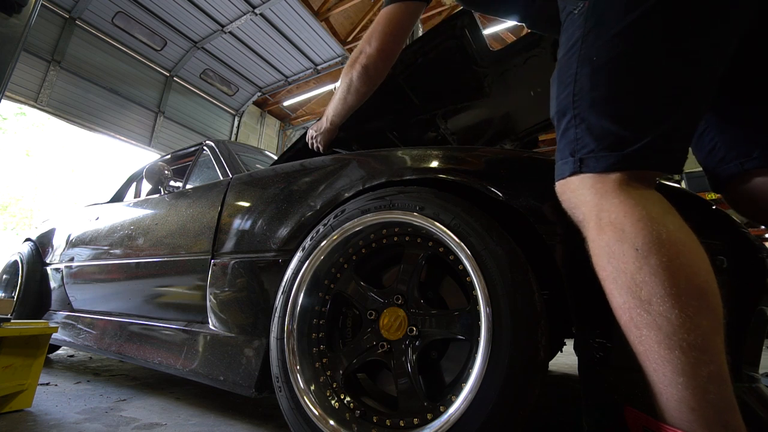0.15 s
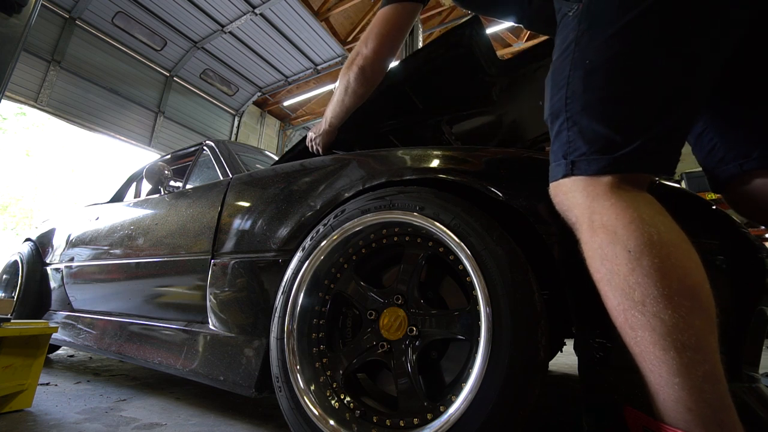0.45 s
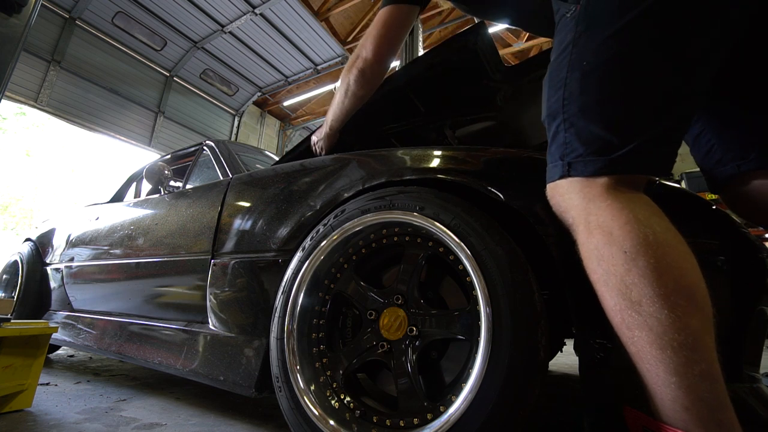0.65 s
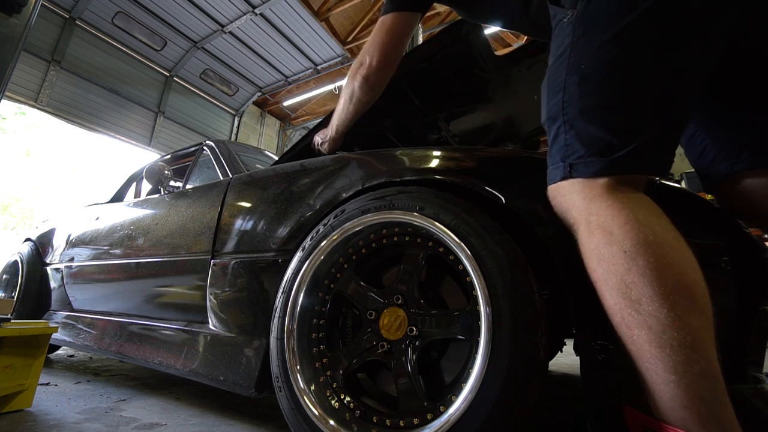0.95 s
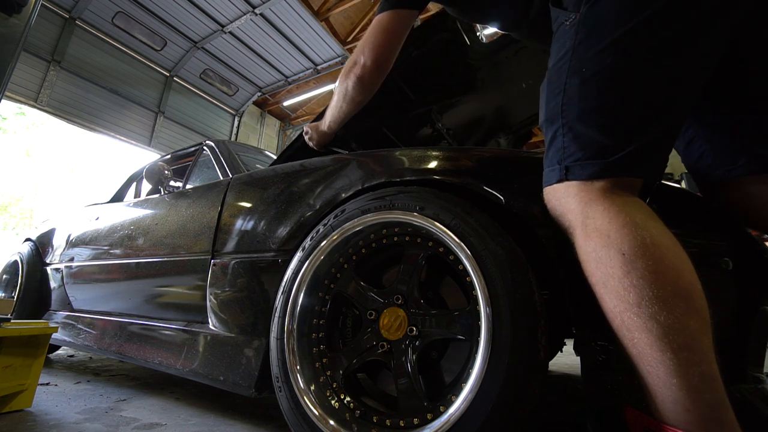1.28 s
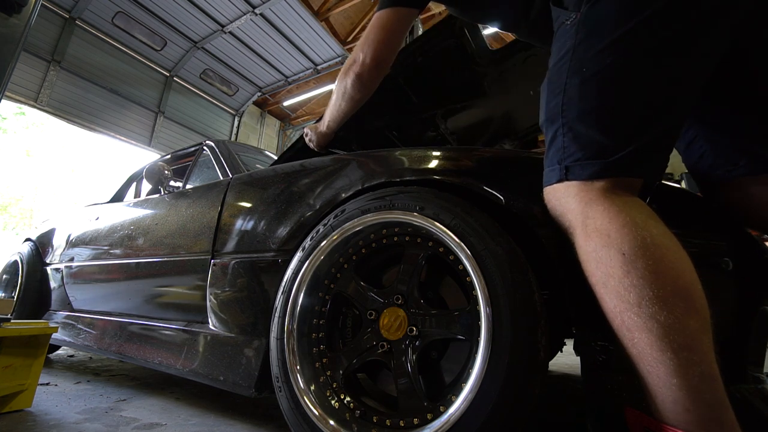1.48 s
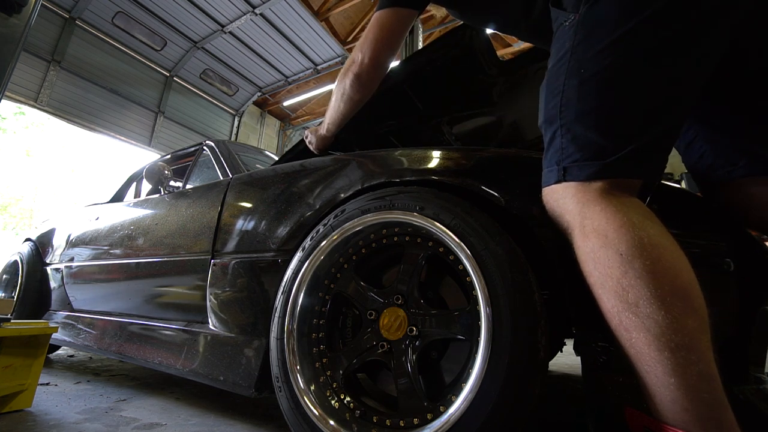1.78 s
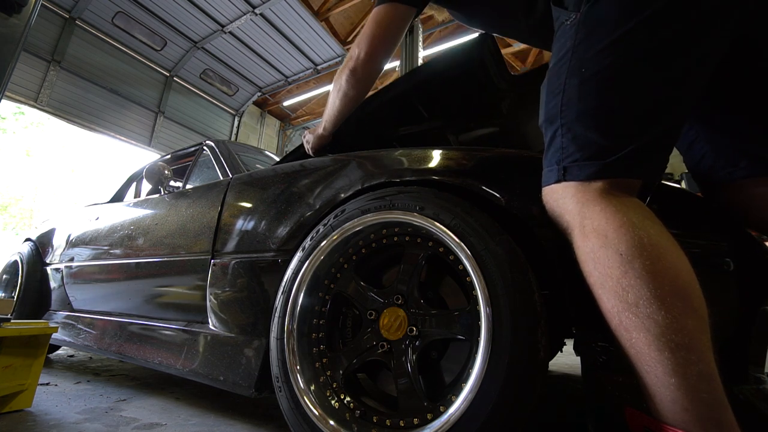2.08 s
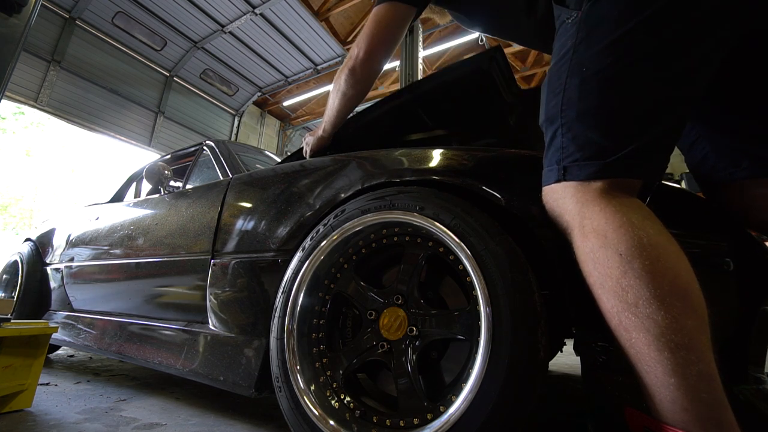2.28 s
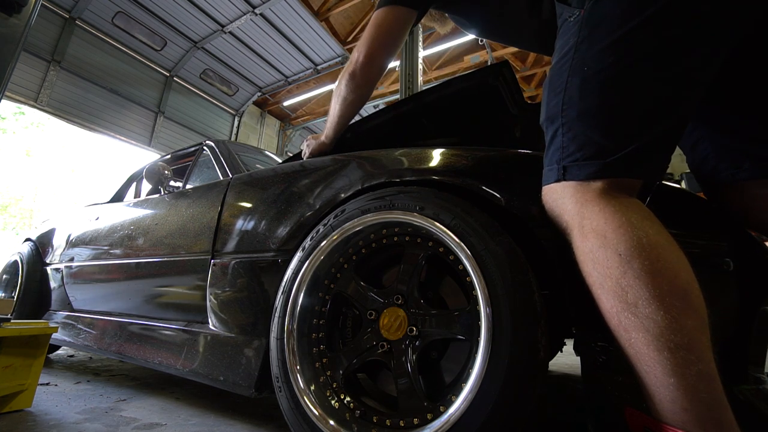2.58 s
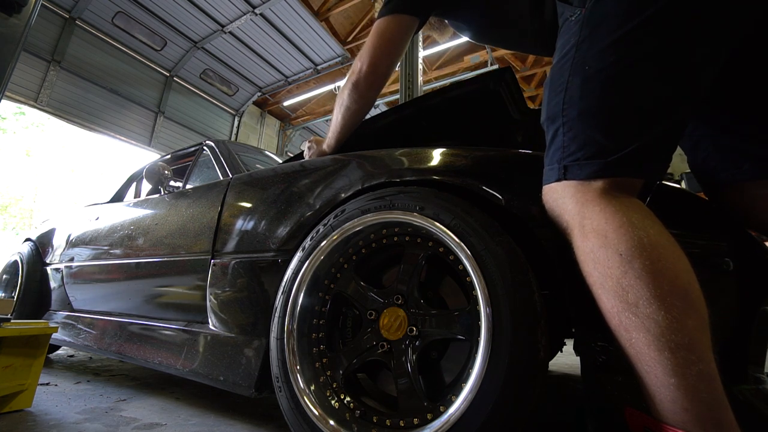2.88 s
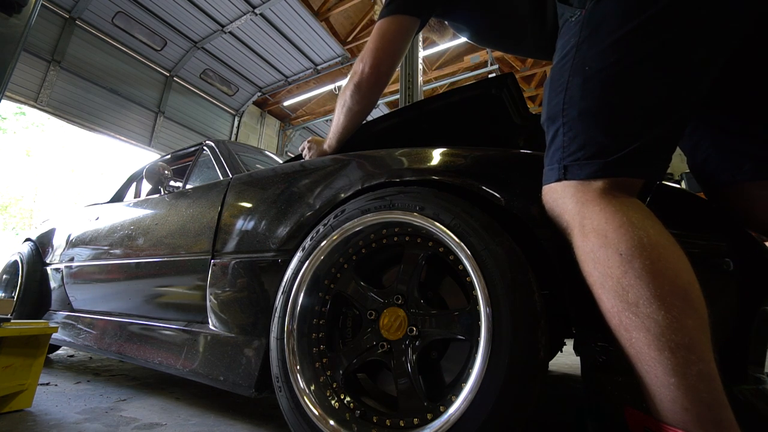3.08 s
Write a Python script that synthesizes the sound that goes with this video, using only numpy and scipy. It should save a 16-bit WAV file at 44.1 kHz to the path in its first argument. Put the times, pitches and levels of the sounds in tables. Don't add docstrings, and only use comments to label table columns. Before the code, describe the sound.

Short compressed-air blasts hiss under a car hood in a humming metal workshop

```python
import sys
import numpy as np
from scipy import signal
from scipy.fft import rfft, irfft, next_fast_len
from scipy.io import wavfile
from scipy.ndimage import uniform_filter1d, map_coordinates

SR = 44100
rng = np.random.default_rng(int(sys.argv[2]) if len(sys.argv) > 2 else 0)


def waveform_to_disk(signal):
    frames = np.transpose(np.atleast_2d(signal))
    scaled = np.clip(frames, -1, 1) * 32767
    samples = np.round(scaled).astype(np.int16)
    wavfile.write(sys.argv[1], SR, samples)


def ratio_of_db(decibels):
    return 10 ** (np.asarray(decibels, float) / 20)


N = 143325


def unit(x):
    return x / np.sqrt(np.mean(x ** 2) + 1e-20)


def along(points, hz):
    f, v = np.transpose(points)
    return np.interp(np.log(hz + 1), np.log(f + 1), v)


def wobble(knots_per_s, n=N):
    at = np.arange(0, n + 64, 64)
    curve = map_coordinates(rng.standard_normal(200), [at * knots_per_s / SR])
    return np.interp(np.arange(n), at, curve)


def filtered(x, response):
    m = next_fast_len(x.shape[-1] + SR // 4, True)
    hz = np.fft.rfftfreq(m, 1 / SR)
    return irfft(rfft(x, m) * response(hz), m)[..., :x.shape[-1]]


def rush(spectrum, patchy_db, n=N, size=512):
    hz = np.fft.rfftfreq(size, 1 / SR)
    shape = (size // 2 + 1, 2 * n // size + 3)
    z = rng.standard_normal((2, *shape)) + 1j * rng.standard_normal((2, *shape))
    patches = uniform_filter1d(rng.standard_normal(shape), size=size // 80, axis=0)
    patches = uniform_filter1d(patches, size=4096 // size, axis=1)
    gain_db = patchy_db * unit(patches) + along(spectrum, hz)[:, None]
    noise = signal.istft(z * ratio_of_db(gain_db), nperseg=size, window="cosine")[1]
    return unit(noise[:, :n])


# frequency in Hz, t60 in s.
HALL_T60 = [(300, .85), (1200, .78), (3500, .71), (7000, .55), (14000, .36)]


def hall(x):
    hz, t, z = signal.stft(rng.standard_normal((2, SR)), SR, nperseg=256)
    t60 = along(HALL_T60, hz)[:, None]
    tail = signal.istft(z * ratio_of_db(-60 * t / t60) / np.sqrt(t60), SR, nperseg=256)[1]
    return signal.fftconvolve(x, tail / np.linalg.norm(tail[0]), axes=1)[:, :x.shape[1]]


# frequency in Hz, level in dB.
FAN_LINES = [(94, 0), (119.9, -2), (141.4, -5), (190, -10), (237, -9), (330, -13), (548, -12), (685, -12)]
# frequency in Hz, density in dB per Hz.
ROOM_AIR = [(20, -24), (45, -6), (110, -7), (250, -2), (650, -4), (1000, -14), (2500, -23), (16000, -63)]
# frequency in Hz, density in dB per Hz.
HISS = [(1500, 3), (6000, -8), (12000, -17), (16000, -28)]


def workshop():
    hum_db, air_db, hiss_db = -36.5, -36, -62
    turns = np.cumsum(1 + .004 * wobble(5)) / SR
    hum = np.zeros(N)
    for hz, level_db in FAN_LINES:
        hum += ratio_of_db(level_db + 1.1 * wobble(7)) * np.sin(2 * np.pi * (hz * turns + rng.random()))
    air = ratio_of_db(air_db) * rush(ROOM_AIR, patchy_db=1.5, size=2048)
    hiss = ratio_of_db(hiss_db + 1.5 * wobble(3)) * rush(HISS, patchy_db=1.2)
    return ratio_of_db(hum_db) * hum + air + hiss


# time in s, rumble level in dB.
MOVING = [(0, -34), (.2, -29), (.3, -41), (.5, -37), (.66, -33), (.85, -42), (1.1, -38), (1.2, -35),
          (1.39, -31), (1.5, -42), (1.9, -38), (2.08, -32), (2.3, -44), (3.25, -44)]
# frequency in Hz, density in dB per Hz.
RUMBLE = [(20, -35), (60, -8), (100, 0), (250, -7), (700, -9), (1500, -19), (6000, -42), (16000, -65)]
# frequency in Hz, density in dB per Hz.
RUSTLE = [(1000, -5), (3000, -10), (9000, -14), (13000, -3), (16000, -18)]


def handling():
    rustle_s, rustle_wide_s, rustle_db = 1.08, .14, -57
    t = np.arange(N) / SR
    s, db = np.transpose(MOVING)
    rumble = ratio_of_db(np.interp(t, s, db) + 2.5 * wobble(40)) * rush(RUMBLE, patchy_db=1.5, size=2048)
    brush = ratio_of_db(rustle_db - 6 * ((t - rustle_s) / rustle_wide_s) ** 2)
    return rumble + brush * rush(RUSTLE, patchy_db=3.5)


# start in s, ring level in dB, crack over ring in dB.
KNOCKS = [
    (.576, -23, 6),
    (.5885, -13, -1.5),
    (.602, -26, 4),
]
# frequency in Hz, level in dB, t60 in s.
HOOD_MODES = [(350, -9, .12), (716, -9, .14), (930, -6, .12), (1290, -8, .12), (1556, 0, .05),
              (1720, -4, .04), (2240, -8, .04), (3800, -12, .04), (4290, -14, .05)]
# frequency in Hz, density in dB per Hz.
CRACK = [(100, -14), (400, -8), (1500, 0), (2600, -9), (4000, -6), (6500, -17), (16000, -40)]
# start in s, frequency in Hz, level in dB, t60 in s.
THUMPS = [
    (.615, 56, -27, .35),
    (.643, 130, -21, .08),
    (1.15, 60, -30, .15),
    (1.161, 280, -21, .015),
    (1.175, 300, -23, .015),
    (1.227, 280, -23, .015),
    (1.246, 250, -25, .02),
    (1.288, 420, -18, .012),
    (1.24, 95, -29, .6),
]
# start in s, level in dB.
TICKS = [
    (.039, -38),
    (.588, -21),
    (.6, -30),
    (1.688, -52),
    (1.824, -52),
    (1.866, -57),
    (3.246, -56),
]
# frequency in Hz, density in dB per Hz.
TICK = [(3000, -14), (7000, -3), (15000, 0)]


def hood():
    rise_s, crack_t60_s, tick_t60_s, hall_db = .0015, .075, .045, -7
    ring, crack, tick = np.zeros((3, N + SR))
    t = np.arange(SR // 4) / SR
    rise = 1 - np.exp(-t / rise_s)
    for s, db, crack_db in KNOCKS:
        here = slice(round(s * SR), round(s * SR) + len(t))
        for hz, level_db, t60 in HOOD_MODES:
            decay = ratio_of_db(level_db + rng.normal(0, 2) - 60 * t / t60)
            ring[here] += ratio_of_db(db) * rise * decay * np.sin(2 * np.pi * (hz * t + rng.random()))
        crack[here] += rise * ratio_of_db(db + crack_db - 60 * t / crack_t60_s)
    for s, hz, db, t60 in THUMPS:
        ring[round(s * SR):][:len(t)] += ratio_of_db(db - 60 * t / t60) * np.sin(2 * np.pi * hz * t)
    for s, db in TICKS:
        tick[round(s * SR):][:len(t)] += ratio_of_db(db - 60 * t / tick_t60_s)
    direct = ring[:N] + crack[:N] * rush(CRACK, patchy_db=2.5) + tick[:N] * rush(TICK, patchy_db=1.2)
    return direct + ratio_of_db(hall_db) * hall(direct)


# start in s, length in s, level in dB.
PEEPS = [
    (.115, .03, -52),
    (1.318, .014, -52),
    (2.0, .012, -55),
    (2.62, .022, -52),
]


def valve():
    t = np.arange(N) / SR
    shape = np.zeros(N)
    for s, length, db in PEEPS:
        shape += ratio_of_db(db) * np.sin(np.pi * np.clip((t - s) / length, 0, 1))
    peep_hz = 7800 + 60 * wobble(40)
    whistle = shape * np.sin(2 * np.pi * np.cumsum(peep_hz) / SR)
    return np.outer([1, 1], whistle)


# valve cracks in s, leak over full flow in dB, fully open in s, held in s, level in dB.
BLASTS = [
    (-.45, -14, -.35, .15, -12),
    (.132, -12, .149, .12, -12),
    (.648, -12, .67, .14, -12),
    (1.333, -17, 1.386, .145, -13.5),
    (2.015, -15, 2.055, .135, -12),
    (2.652, -14, 2.668, .16, -13),
]
# engine bay answer in dB, opening in s, closing in s.
TRIGGER = [
    (-26, .016, .1),
    (-28, .014, .15),
    (-33, .022, .12),
    (-22, .024, .13),
    (-23, .06, .15),
    (-26, .018, .1),
]
# frequency in Hz, density in dB per Hz.
JET = [(300, -30), (650, -13), (1300, -7), (2200, -1.5), (3300, -1.5), (5000, -3.5), (7500, -8.5),
       (16000, -27)]
# frequency in Hz, density in dB per Hz.
FIZZ = [(2500, -25), (4700, -1), (6000, -2), (10000, -5), (15800, -13)]
# frequency in Hz, density in dB per Hz.
HOLLOW = [(650, -40), (880, -8), (1150, 0), (1350, -8), (1800, -5), (2600, -25), (4000, -60)]
# frequency in Hz, width in Hz, boost in dB.
PANEL = [(955, 14, 3), (1122, 18, 6), (1180, 14, 5), (1209, 8, 7), (1664, 14, 5), (1836, 14, 4),
         (1935, 24, 3), (2158, 16, 3), (2370, 16, 3), (3350, 20, 3), (4590, 20, 3), (4838, 16, 4)]


def panel(hz):
    response = 1
    for centre, width, db in PANEL:
        damping = 1j * hz * width
        response = response + (ratio_of_db(db) - 1) * damping / (centre ** 2 - hz ** 2 + damping)
    return response


def air_gun():
    crack_s, sag_db_per_s = .022, 7
    fizz_db, fizz_sag_db_per_s = -4.5, 90
    hall_db = -2.5
    pre = SR // 2
    n = N + pre
    t = (np.arange(n) - pre) / SR
    body, fizz, hollow = np.zeros((3, n))

    def ramp(start_s, length_s):
        return np.clip((t - start_s) / length_s, 0, 1)

    for (s, leak_db, full, held, db), (bay_db, opens, closes) in zip(BLASTS, TRIGGER):
        leak = ratio_of_db(leak_db)
        opening = leak * ramp(s, crack_s) + (1 - leak) * ramp(full - opens / 2, opens)
        flow = opening * (1 - ramp(full + held, closes)) ** 2
        since = np.clip(t - full, 0, 1)
        body += ratio_of_db(db - sag_db_per_s * since) * flow
        hollow += ratio_of_db(bay_db) * flow ** 1.3
        fizz += ratio_of_db(db + fizz_db - fizz_sag_db_per_s * since) * flow ** 1.1
    jet = body * ratio_of_db(.8 * wobble(25, n)) * rush(JET, patchy_db=.8, n=n)
    jet += fizz * ratio_of_db(1.2 * wobble(30, n)) * rush(FIZZ, patchy_db=1.2, n=n)
    jet += hollow * rush(HOLLOW, patchy_db=2.5, n=n)
    jet = filtered(jet, panel)
    wet = ratio_of_db(hall_db)
    return ((jet + wet * hall(jet)) / np.hypot(1, wet))[:, pre:]


# frequency in Hz, left-right likeness from 0 to 1.
ALIKE = [(110, .999999), (180, .999), (350, .985), (700, .9), (1400, .7), (3000, .46), (6000, .3),
         (12000, .37)]
# frequency in Hz, left over right in dB.
LEAN = [(1500, 0), (5000, 2), (15000, 1)]


def spread(pair):
    m = next_fast_len(N + SR // 4, True)
    hz = np.fft.rfftfreq(m, 1 / SR)
    a, b = rfft(pair, m)
    turn = np.arccos(np.clip(along(ALIKE, hz), -1, 1)) / 2
    lean = ratio_of_db(along(LEAN, hz) / 2)
    mid, side = a * np.cos(turn), b * np.sin(turn)
    return irfft(np.array([(mid + side) * lean, (mid - side) / lean]), m)[:, :N]


def scene():
    return spread(workshop() + handling() + hood() + valve() + air_gun())


def roll_off(x):
    return signal.sosfilt(signal.butter(12, 15940, fs=SR, output="sos"), x)


def record(dry):
    duck_from_db, duck_share, duck_s, top_hz = -23, .35, .05, 15920
    power = np.mean(dry ** 2, 0)
    power = uniform_filter1d(power, int(duck_s * SR), origin=int(duck_s * SR / 4))
    level_db = 10 * np.log10(np.abs(power) + 1e-12)
    duck = ratio_of_db(-duck_share * np.maximum(level_db - duck_from_db, 0))
    mix = filtered(dry, lambda hz: hz < top_hz) * duck
    return roll_off(mix)


dry = scene()
out = record(dry)
waveform_to_disk(out)
```